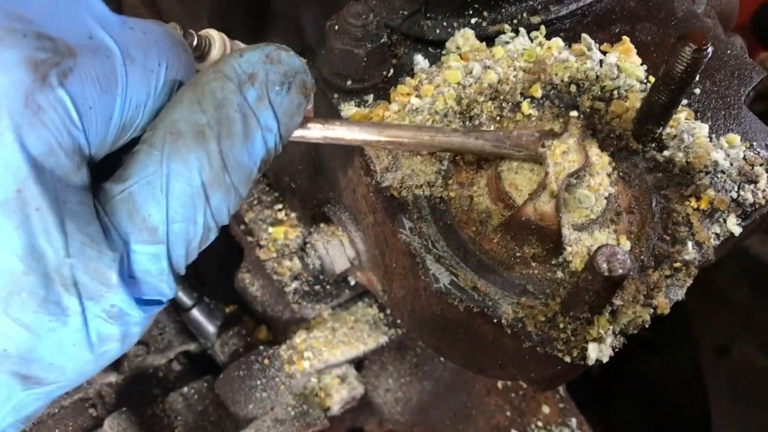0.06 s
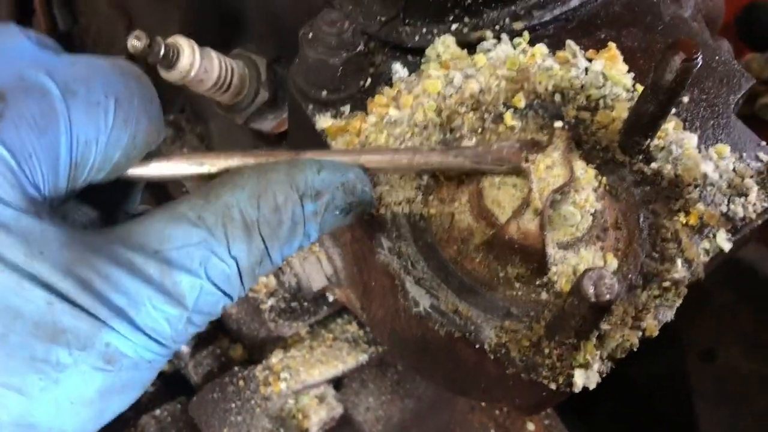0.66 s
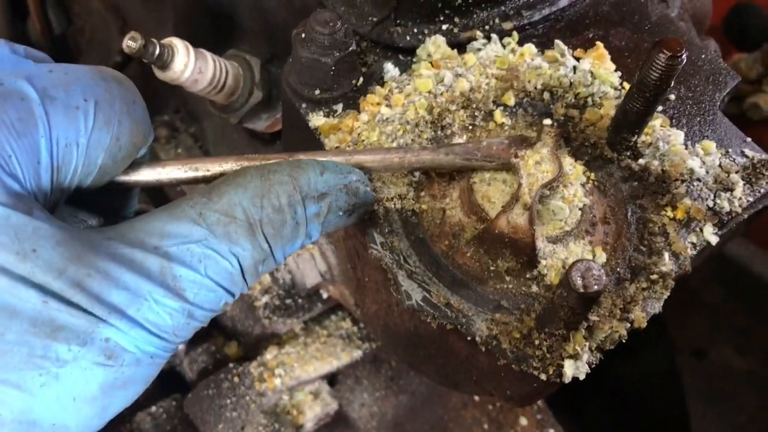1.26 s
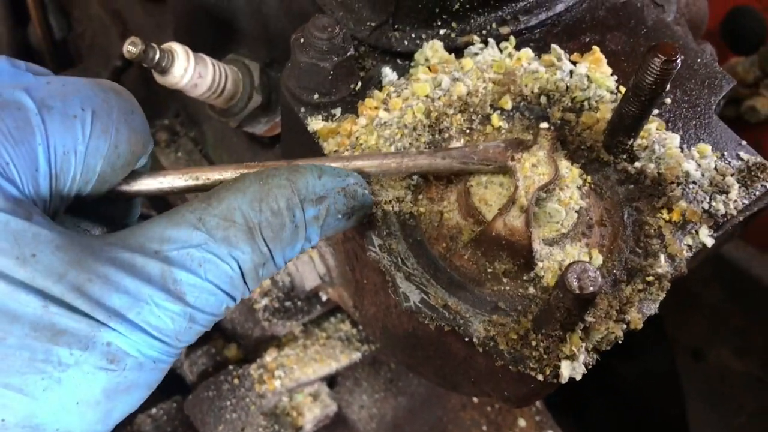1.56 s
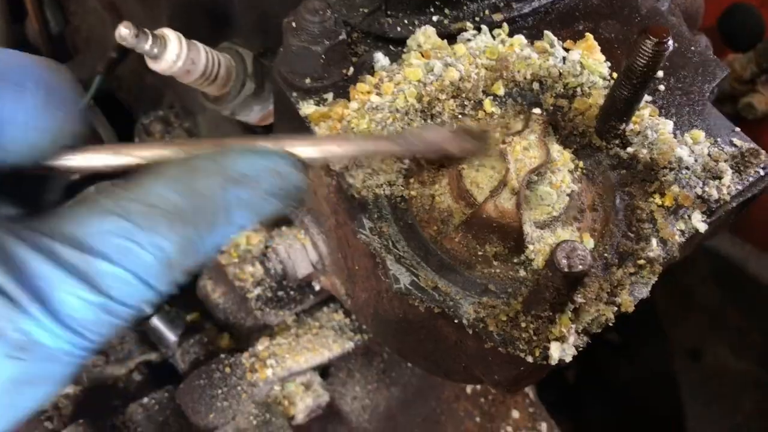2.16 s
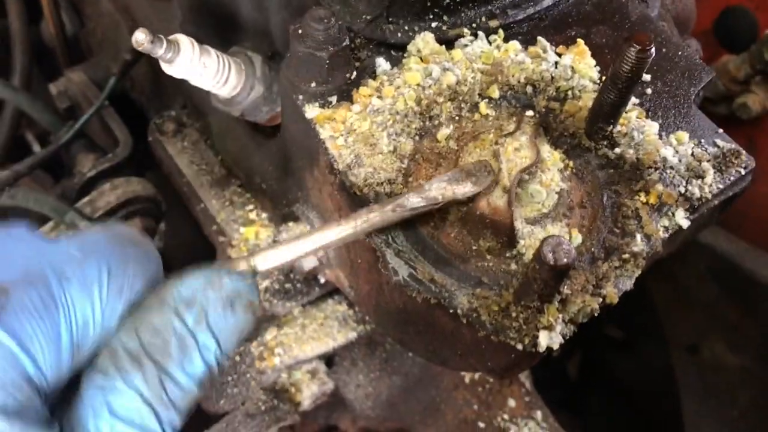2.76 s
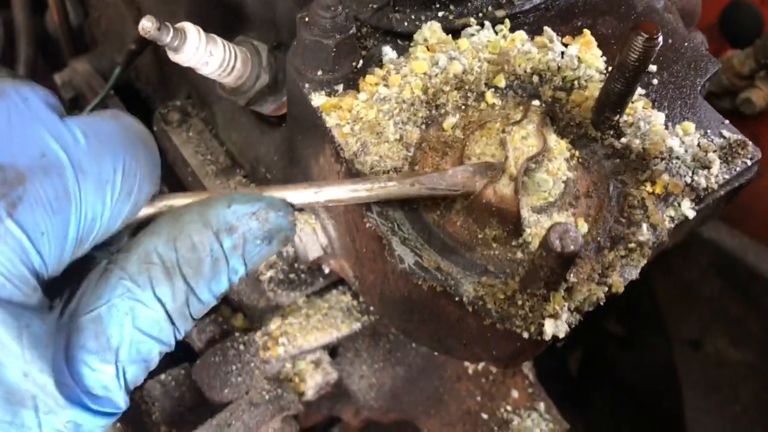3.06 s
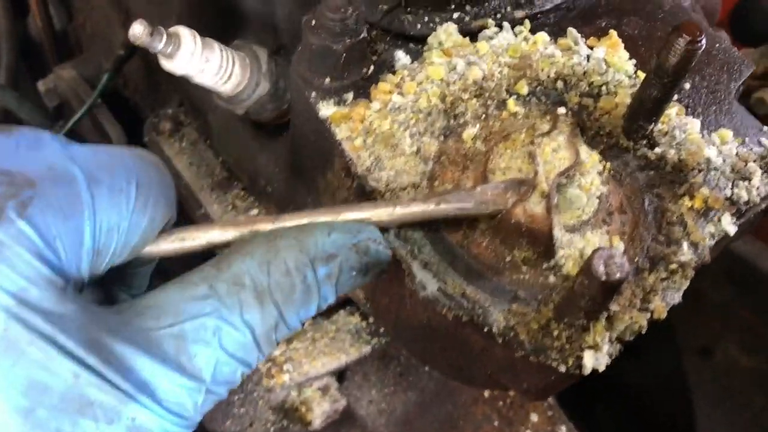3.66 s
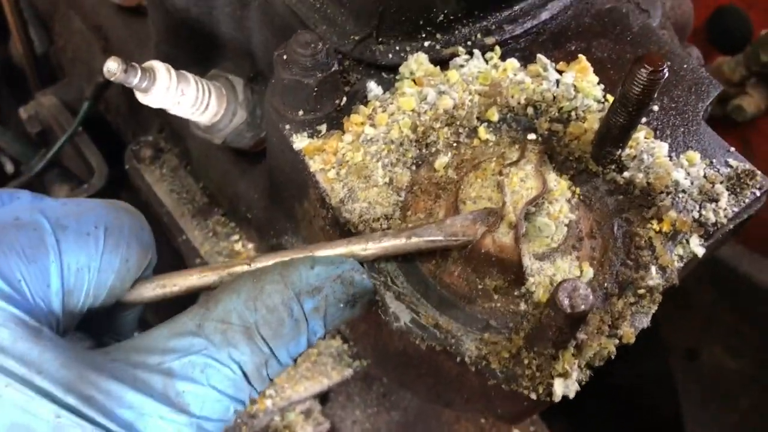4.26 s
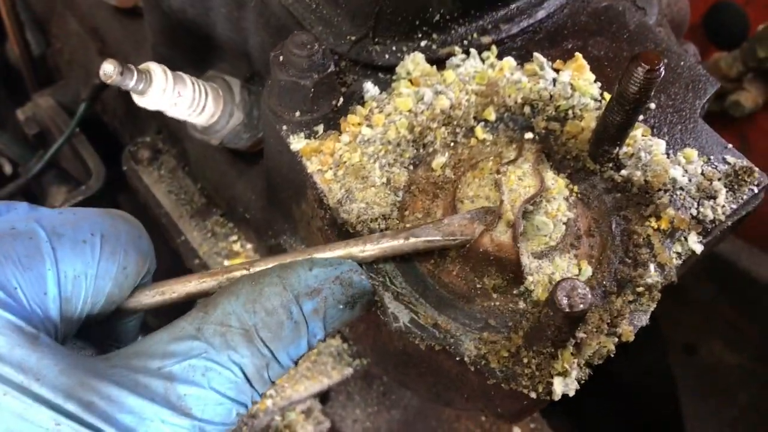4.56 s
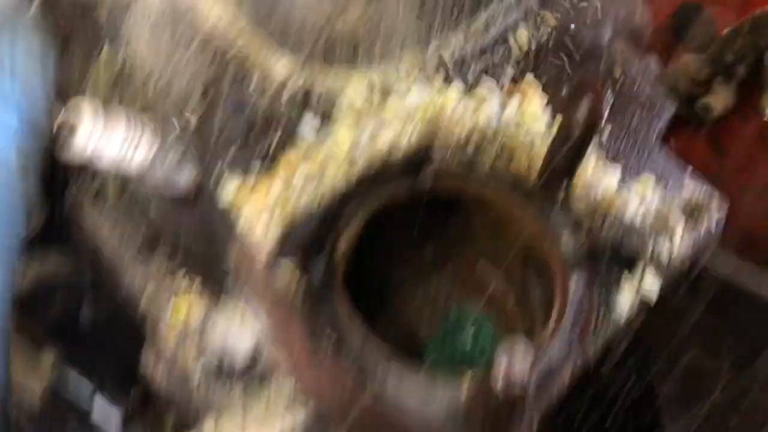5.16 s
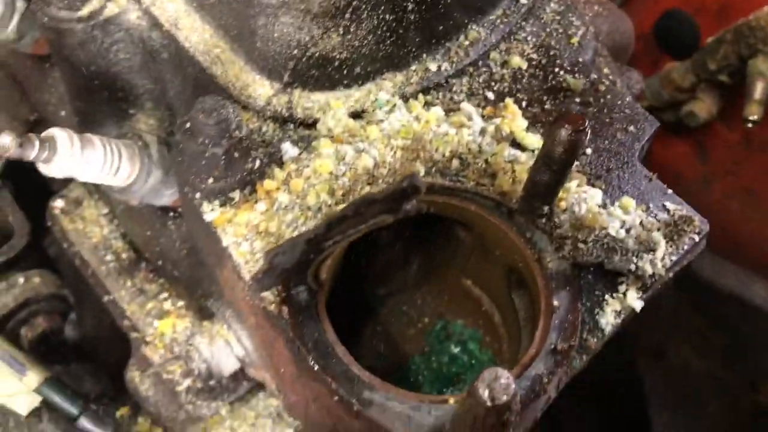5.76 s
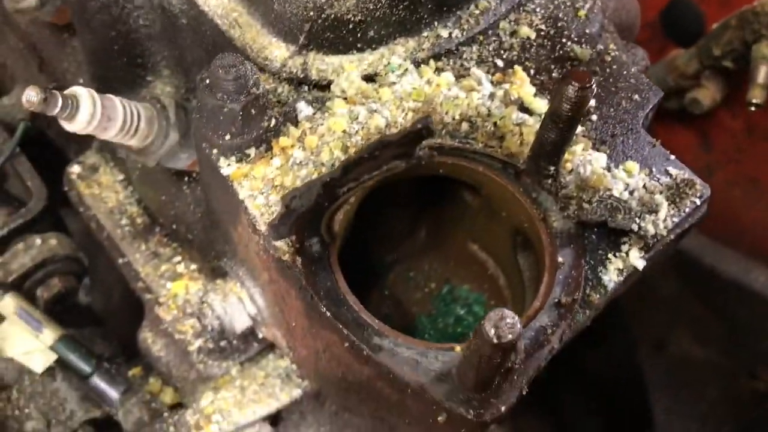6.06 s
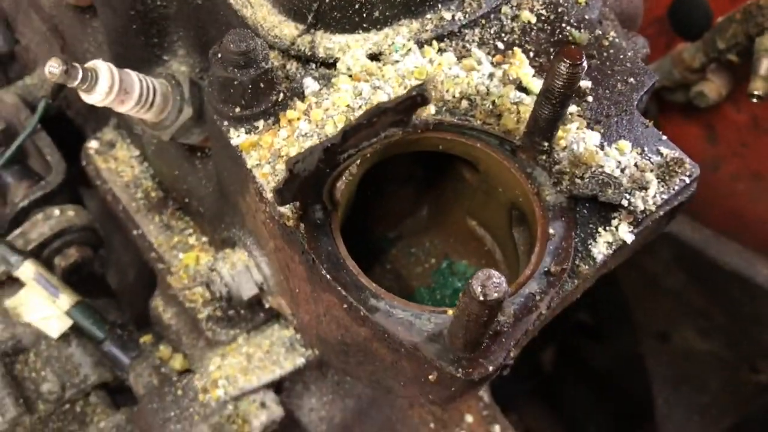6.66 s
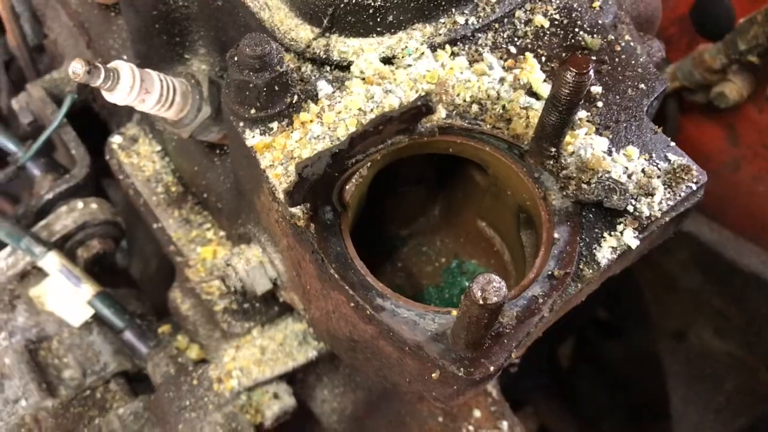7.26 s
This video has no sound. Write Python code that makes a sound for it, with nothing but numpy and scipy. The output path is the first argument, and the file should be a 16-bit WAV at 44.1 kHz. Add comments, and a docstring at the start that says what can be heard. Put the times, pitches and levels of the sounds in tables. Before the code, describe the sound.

Close gritty scraping and clicks on an engine, followed by a sharp crack, a splash and a part tumbling to the floor.

```python
"""A screwdriver scrapes and clicks under a crusted-in engine thermostat, close up, in a garage.
A rubber glove hisses along the shaft, crumbs snap off, and blade and crust ring at each slip.
The crust cracks, the uncorked housing booms and coolant sprays out. The freed thermostat knocks
its way down the engine bay, ringing each part it hits, and rattles to rest on the floor.
Under it all lies a room tone of air, hum and low drone."""
import sys
import numpy as np
from scipy import signal
from scipy.fft import rfft, irfft, next_fast_len
from scipy.io import wavfile

SR = 44100
rng = np.random.default_rng(int(sys.argv[2]) if len(sys.argv) > 2 else 0)


def store_wav(level_fs):
    """Save 16-bit WAV to argv[1]."""
    pcm = np.round(np.clip(np.atleast_2d(level_fs), -1, 1) * 32767)
    wavfile.write(sys.argv[1], SR, pcm.T.astype(np.int16))


N = 325899
TIME = np.arange(N) / SR
AFTER = TIME[:SR]  # the second that follows a hit
DETUNE = 0.014  # each contact shifts a loose part's modes by about this share


def amp(db):
    """Decibels to gain."""
    return 10 ** (np.asarray(db) / 20)


def unit(x):
    """Scales to rms 1."""
    return x / np.sqrt(np.mean(x ** 2) + 1e-20)


def curve_at(points, hz):
    """A curve's value on a log-frequency axis."""
    freqs, values = np.transpose(points)
    return np.interp(np.log(hz + 1), np.log(freqs + 1), values)


def colour(x, eq):
    """Shapes x with an EQ curve, at rms 1."""
    size = next_fast_len(len(x))
    hz = np.arange(size // 2 + 1) * SR / size
    return unit(irfft(rfft(x, size) * amp(curve_at(eq, hz)), size)[:len(x)])


def add(mix, start, sound):
    """Mixes a sound in at a start time in seconds."""
    part = mix[round(start * SR):][:len(sound)]
    part += sound[:len(part)]


def arch(start, length, db, skew=1, sharpness=1):
    """The envelope of one movement: it speeds up and slows down; a skew under 1 peaks early."""
    done = np.clip((TIME - start) / length, 0, 1)
    return amp(db) * abs(np.sin(np.pi * done ** skew)) ** sharpness


def flow(start, rise, db, t60, hold=0, sag_db_per_s=0):
    """The envelope of running liquid: attack, sagging hold, release."""
    since = TIME - start - rise
    fall_db = sag_db_per_s * np.clip(since, 0, hold) + 60 * np.maximum(since - hold, 0) / t60
    return np.clip(1 + since / rise, 0, 1) ** 2 * amp(db - fall_db)


def lumpy(db):
    """A gain that comes in uneven clumps, some tens a second."""
    return amp(db * colour(rng.standard_normal(N), [(8, 0), (45, 0), (120, -50), (400, -120)]))


def grains(per_s, spread_db, wash=0):
    """Tiny impacts of uneven size over a wash of still smaller ones."""
    sizes = amp(spread_db * np.minimum(rng.exponential(1, N), 5)) * rng.choice([-1, 1], N)
    hits = rng.random(N) < per_s / SR
    return unit(sizes * hits) + wash * rng.standard_normal(N)


def ring(modes, rise=0.00055, uneven_db=0, wander_hz=5):
    """Damped modes, uneven with the point of impact; loose contact widens them (wander_hz at 1 kHz)."""
    out = np.zeros(SR)
    for hz, db, t60 in modes:
        fade = amp(db + uneven_db * rng.standard_normal() - 60 * AFTER / t60)
        width_hz = wander_hz * hz / 1000
        drift = np.cumsum(rng.standard_normal(SR)) * np.sqrt(2 * np.pi * width_hz / SR)
        out += fade * np.sin(2 * np.pi * (hz * AFTER + rng.random()) + drift)
    return out * (1 - np.exp(-AFTER / rise))


def shifted(modes, tilt=0):
    """The modes as one contact sounds them: detuned a little, tilted about 3 kHz (dB/octave)."""
    return [(hz * (1 + DETUNE * rng.standard_normal()), db + tilt * np.log2(hz / 3000), t60)
            for hz, db, t60 in modes]


# edges of an impact's five bands (frequency [Hz]); a four-band hit omits the lowest band
BAND_EDGES = [120, 500, 1800, 4500, 8500, 16000]
def clatter(t60, bands_db, damping, rise, snap=0, bunched_db=0):
    """An optional snap, then countless close modes bunched into chance peaks; highs die sooner."""
    t, out = AFTER[:SR // 2], np.zeros(SR // 2)
    spike = snap * signal.unit_impulse(len(t), 10)
    peaks = [(hz, bunched_db * rng.standard_normal()) for hz in range(500, SR // 2, 70)]
    for hi, lo, db in zip(BAND_EDGES[::-1], BAND_EDGES[-2::-1], bands_db[::-1]):
        modes = spike + colour(rng.standard_normal(len(t)), peaks)
        band = signal.sosfilt(signal.butter(2, [lo, hi], "band", fs=SR, output="sos"), modes)
        fade = amp(-60 * t / t60 * (np.sqrt(lo * hi) / 3000) ** damping)
        out += amp(db) * band * fade * np.linalg.norm(fade) / np.linalg.norm(band * fade)
    return out * (1 - np.exp(-t / rise))


def tilted(bands_db, db, tilt):
    """Band levels of one hit, made brighter or duller by its tilt about 3 kHz (dB/octave)."""
    centres = np.sqrt(np.multiply(BAND_EDGES[1:], BAND_EDGES[:-1]))[-len(bands_db):]
    return np.add(bands_db, db) + tilt * np.log2(centres / 3000)


# EQ of the air and of the drone (frequency [Hz], level [dB])
AIR_EQ = [(20, -30.5), (45, -9), (70, -8), (130, -12.5), (260, -18), (480, -27.5), (950, -25),
          (2500, -36.5), (6500, -42), (16000, -44)]
DRONE_EQ = [(25, -24.5), (56, -12.5), (64, 6.5), (73, -19), (200, -17.5), (300, -20), (700, -53.5)]
# hum tones (frequency [Hz], level [dB])
HUM_TONES = [(102, -73), (149, -71.5), (199.2, -75.5)]
# drone swells (start [s], length [s], level [dB])
DRONE_SWELLS = [(2.552, 1.28, -65), (4.2, 1.95, -67), (5.499, 0.87, -58.5), (6.83, 0.61, -58)]
def room_tone(air_db=-62.5, drone_floor_db=-68.5):
    """The bed: still air, a wavering hum and a low drone that swells now and then."""
    out = amp(air_db) * colour(rng.standard_normal(N), AIR_EQ)
    for hz, db in HUM_TONES:
        drift = np.cumsum(rng.standard_normal(N)) * 0.53 / np.sqrt(SR)
        out += amp(db) * np.sqrt(2) * np.sin(2 * np.pi * (hz * TIME + drift))
    swells = np.max([arch(*swell) for swell in DRONE_SWELLS], axis=0) + amp(drone_floor_db)
    return out + swells * colour(rng.standard_normal(N), DRONE_EQ)


# glove slides (start [s], length [s], level [dB])
SLIDES = [(0, 0.056, -56), (0.136, 0.27, -64), (0.32, 0.14, -59.5), (0.414, 0.065, -63),
          (0.443, 0.032, -47.5), (0.478, 0.067, -59.5), (.53, 0.32, -71.5), (2.03, 0.26, -66),
          (3.26, 0.58, -67)]
# EQ of the rubber's hiss (frequency [Hz], level [dB])
GLOVE_EQ = [(200, -8), (700, -1), (1500, -7.5), (4000, 0), (9000, 0.5), (11000, 0), (15500, 3)]
# ring of the steel shaft (frequency [Hz], level [dB], t60 [s])
SHAFT_MODES = [(2520, 5, 0.053), (3190, 0.5, 0.061), (4620, -3.5, 0.069)]
def glove(release_db_per_s=213):
    """Rubber hisses over the shaft and catches as the grip shifts, ringing the steel faintly."""
    slides = sum(arch(*slide, skew=0.62, sharpness=0.92) for slide in SLIDES)
    release_db = release_db_per_s * TIME  # loosened dust crackles on as a slide ends
    slides_db = np.maximum.accumulate(20 * np.log10(slides + 1e-12) + release_db) - release_db
    catches = grains(per_s=75, spread_db=2)
    shaft = unit(signal.oaconvolve(catches, ring(SHAFT_MODES))[:N])
    hiss = colour(grains(per_s=2500, spread_db=2.1, wash=0.82), GLOVE_EQ) * lumpy(db=2)
    grip = arch(start=0, length=0.97, db=-75.5, skew=0.34, sharpness=0.4)
    return amp(slides_db) * hiss + grip * shaft


# crumb snaps (time [s], level [dB])
CRUMBS = [(0.514, -34), (0.9347, -42.5), (1.112, -30), (1.841, -43), (4.9084, -31), (4.9364, -38),
          (5.129, -31), (5.296, -33), (6.8094, -49), (7.0588, -41), (7.317, -43)]
# EQ of a bright tick, crumb or drip (frequency [Hz], level [dB])
TICK_EQ = [(200, -41.5), (1500, -24), (3300, -5.5), (7000, 3.5), (11000, -2.5), (16000, 4.5)]
def crumbs(trim_db=-2, t60=0.007):
    """Single grains of crust snap off with a dry tick."""
    out, t = np.zeros(N), AFTER[:SR // 20]
    for start, db in CRUMBS:
        tick = colour(rng.standard_normal(len(t)), TICK_EQ) * amp(-60 * t / t60)
        add(out, start, amp(db + trim_db) * tick / abs(tick).max())
    return out


# blade strokes, and its light contact between them (start [s], length [s], level [dB], rumble send [dB])
STROKES = [(2.134, 0.059, -43, -15.5), (2.194, 0.26, -44, -17), (2.34, 0.35, -58, -7.5),
           (2.49, 0.021, -38.5, -32), (2.638, 0.21, -59.5, -11.5), (2.803, 0.34, -50, -5.5),
           (3.087, 0.24, -58.5, 1.5), (3.254, 0.25, -71, 3.5), (3.621, 0.1, -55.5, -1.5),
           (3.79, 0.15, -59, -0.5)]
RESTING_CONTACT = (1, 5, -82.5, -5.5)
# EQ of the grit and of the housing's rumble (frequency [Hz], level [dB])
GRIT_EQ = [(500, -15.5), (950, -7.5), (1120, -9), (1300, -2.5), (3000, -7), (3800, 0.5), (5000, -4.5),
           (6500, -7.5), (8500, -8), (16000, -12.5)]
RUMBLE_EQ = [(120, -44), (200, 4), (280, -2.5), (350, 6), (560, -6.5), (660, 7.5), (760, -9.5), (1400, -10),
             (2500, -43.5)]
# ring of shaft and housing under the grinding (frequency [Hz], level [dB], t60 [s])
GRIND_MODES = [(1107, -6.5, 0.12), (1497, -3.5, 0.077), (2266, -2.5, 0.0665), (3395, 6, 0.01605),
               (4140, 2.5, 0.023), (5470, 1.5, 0.027), (6310, 6, 0.017)]
def blade_scrape():
    """The blade grinds grains off the crust and shakes the housing; strokes bite fast, then ease."""
    grit = colour(grains(per_s=4500, spread_db=1.5, wash=0.27), GRIT_EQ)
    catches = grains(per_s=3000, spread_db=4.5, wash=0.77)
    metal = unit(signal.oaconvolve(catches, ring(GRIND_MODES, wander_hz=5.8))[:N])
    grind = amp(-1.5) * (grit + amp(-4.5) * metal) * lumpy(db=1)
    rumble = colour(grains(per_s=900, spread_db=5.3, wash=1), RUMBLE_EQ)
    out = np.zeros(N)
    for start, length, db, rumble_db in STROKES + [RESTING_CONTACT]:
        out += arch(start, length, db, skew=0.64, sharpness=1.88) * (grind + amp(rumble_db) * rumble)
    return out


# blade slips (time [s], t60 [s], level [dB], tilt [dB/octave], blade ring [dB], crust ring [dB])
SLIPS = [(2.1485, 0.015, -27, -1.5, -44, -26.5), (2.17, .03, -58, -9, -53, -64),
         (2.193, 0.022, -64, 6, -63, -70), (2.3803, 0.0092, -36, 4, -29.5, -56),
         (2.4813, 0.004, -23, 1.5, -24.5, -32), (2.5056, 0.027, -29, -3.5, -34, -30),
         (2.589, 0.018, -61, 8.5, -49, -69), (2.723, 0.022, -68, 11, -65, -73),
         (3.84, 0.063, -47.5, 3, -77, -66)]
# a click's four bands, low to high (level [dB])
CLICK_BANDS = [-31.5, 0.5, -1, -5]
# ring of the pressed blade and of the crusted rim (frequency [Hz], level [dB], t60 [s])
BLADE_MODES = [(1219, 2, 0.036), (1143, -13.5, 0.019), (3706, 2.5, 0.015), (3920, 5.5, 0.015)]
CRUST_MODES = [(2424, -6, 0.064), (2917, -2.5, 0.036), (3240, -4, 0.038), (3500, 4, 0.022),
               (5900, -6, 0.019)]
def blade_slips(full_slip_db=-28, tilt_per_db=0.38):
    """Each slip clicks and rings blade and crust; softer slips ring the blade duller."""
    out = np.zeros(N)
    for start, t60, db, tilt, blade_db, crust_db in SLIPS:
        blade = shifted(BLADE_MODES, tilt_per_db * (blade_db - full_slip_db))
        add(out, start, clatter(t60, tilted(CLICK_BANDS, db, tilt), damping=0.11, rise=1e-4, snap=0.72))
        add(out, start, amp(blade_db) * ring(blade, wander_hz=22))
        add(out, start, amp(crust_db) * ring(CRUST_MODES, wander_hz=30.2))
    return out


# cracks in the crust (time [s], t60 [s], level [dB], tilt [dB/octave], rim ring [dB])
CRACKS = [(4.9993, 0.0043, -7, -1, -28.5), (5.0175, 0.011, -7.5, -3, -30.5), (5.0238, 0.032, -14, 1.5, -31),
          (5.027, 0.032, -14, 3.5, -28.5), (5.0352, 0.017, -12.5, -1.5, -19.5),
          (5.043, 0.015, -10, -3.5, -6.5), (5.055, 0.038, -14.5, 1.5, -27.5),
          (5.0722, 0.019, -7, 0.2, -19.5), (5.078, 0.0028, -13.5, 1.5, -18.5)]
# a crack's four bands, low to high (level [dB])
CRACK_BANDS = [-8, -1, -2, -6.5]
# ring of the housing's rim (frequency [Hz], level [dB], t60 [s])
RIM_MODES = [(1038, -10.5, 0.06), (2155, -4.5, 0.036), (2440, 1, 0.028), (2780, -3, .03), (3360, 2, .026),
             (4120, -1.5, 0.024)]
def crust_break():
    """The crust gives way in a run of sharp cracks, ringing the rim as it tears free."""
    out = np.zeros(N)
    for start, t60, db, tilt, rim_db in CRACKS:
        add(out, start, clatter(t60, tilted(CRACK_BANDS, db, tilt), damping=0.14, rise=8e-5, snap=1.7))
        add(out, start, amp(rim_db) * ring(shifted(RIM_MODES), wander_hz=30.06))
    return out


# coolant gushing out, then landing on the floor (start [s], attack [s], level [dB], t60 [s])
GUSHES = [(4.995, .04, -22.5, 0.23), (6.146, 0.052, -32.5, 0.088)]
# EQ of the spray (frequency [Hz], level [dB])
SPRAY_EQ = [(150, -6.5), (400, -8), (900, -9), (2000, -4), (4000, -7.5), (7000, -9), (16000, -14)]
# wet slaps on metal and floor (time [s], t60 [s], level [dB], tilt [dB/octave])
SPLASHES = [(5.116, 0.035, -41.5, 9), (5.17, 0.077, -43, 4.5), (5.426, 0.062, -45.5, 3.5),
            (5.696, 0.14, -33, 0.5), (6.29, 0.068, -54.5, -5.5), (6.319, 0.071, -44, -2.5)]
# a splash's five bands, low to high (level [dB])
SPLASH_BANDS = [-9.5, -6, -0.5, 0, -3.5]
def coolant():
    """Droplets fizz in uneven clumps and thin to a patter, then drips; larger gouts slap down."""
    spray = colour(grains(per_s=750, spread_db=3.8, wash=1), SPRAY_EQ) * lumpy(db=2)
    patter = flow(start=5.18, rise=0.031, db=-48, t60=0.97, hold=1.235, sag_db_per_s=6.5)
    out = (patter + sum(flow(*gush) for gush in GUSHES)) * spray
    drips = colour(grains(per_s=22, spread_db=2.4), TICK_EQ)
    out += flow(start=6.08, rise=0.82, db=-76, t60=3.1) * drips
    for start, t60, db, tilt in SPLASHES:
        add(out, start, clatter(t60, tilted(SPLASH_BANDS, db, tilt), damping=0.45, rise=0.0028))
    return out


# pressure pops (time [s], level [dB])
POPS = [(5.004, -34), (5.026, -18.5), (5.077, -31)]
# boom of the housing (frequency [Hz], level [dB], t60 [s])
HOUSING_MODES = [(172.2, 0.5, 0.21), (137, -3.5, 0.07), (519, -22.5, 0.7)]
def housing_pop():
    """The pressure uncorks the housing, which booms in its low modes."""
    out = np.zeros(N)
    for start, db in POPS:
        add(out, start, amp(db) * ring(HOUSING_MODES, rise=0.0016, wander_hz=0.96))
    return out


# knocks on engine parts, then the landing on the floor (time [s], t60 [s], level [dB], tilt [dB/octave])
KNOCKS = [(5.221, 0.31, -40, 1), (5.5514, 0.057, -10.5, 1.6), (5.601, 0.062, -12, 1),
          (5.642, 0.066, -10, -2), (5.774, 0.1, -28, 0), (5.8421, 0.13, -29.5, 0), (6, 0.072, -36.5, -2),
          (6.183, 0.12, -32, 0.5)]
# a knock's five bands, low to high (level [dB])
KNOCK_BANDS = [-19, -7, 0, 1, 1]
# ring of each knock in turn, and of a sheet-metal panel (frequency [Hz], level [dB], t60 [s])
KNOCK_MODES = [
    [(3290, -41, 0.24), (3820, -37.5, 0.13), (4000, -37, 0.19)],
    [(143, -33, .25), (1362, -18.5, 0.1), (1865, -16, 0.063), (4700, -23, 0.08), (7050, -17.5, 0.048)],
    [(1286, -15.5, 0.22), (1770, -18.5, 0.061), (2090, -11, 0.055), (5400, -12, 0.065),
     (6460, -17.5, 0.065)],
    [(313, -26, 0.13), (370, -32.5, .3), (585, -24, 0.15), (706, -16, 0.073), (873, -13, 0.13),
     (965, -13.5, 0.13), (1104, -6, 0.068), (1498, -13, 0.1), (2334, -21, 0.19), (6200, -9, 0.05)],
    [(206, -27.5, 0.14), (364, -27.5, 0.13), (2740, -34.5, 0.16), (5410, -23.5, 0.063)],
    [(205, -28, 0.069), (2365, -27, 0.067), (2900, -26.5, 0.066), (3570, -13, 0.03), (5150, -20, 0.057),
     (6220, -18.5, 0.079)],
    [(2314, -33.5, 0.066), (2990, -34.5, 0.055), (5620, -28.5, 0.081)],
    [(609, -43, 0.21), (1040, -38.5, 0.15), (1385, -31, .07), (2417, -29, 0.23)],
]
PANEL_MODES = [(71, -44, 0.75), (924, -32.5, 1), (1060, -39.5, 0.2)]
def falling_knocks(panel_start=5.645):
    """Each knock of the falling thermostat clatters and rings; a panel hums on after the heaviest."""
    out = np.zeros(N)
    for (start, t60, db, tilt), modes in zip(KNOCKS, KNOCK_MODES):
        bands_db = tilted(KNOCK_BANDS, db, tilt)
        add(out, start, clatter(t60, bands_db, damping=0.36, rise=0.00078, bunched_db=1))
        add(out, start, ring(modes, rise=0.0006, wander_hz=7))
    low_cut = signal.butter(2, BAND_EDGES[0], "high", fs=SR, output="sos")
    out = signal.sosfilt(low_cut, out)  # the knocks keep clear of the deep bass
    add(out, panel_start, ring(PANEL_MODES, rise=0.004, wander_hz=0.98))
    return out


# spells of rim chatter (start [s], length [s], level [dB])
CHATTER = [(6.025, 0.44, -47), (6.61, 0.41, -66.5)]
# bounces (time [s], level [dB], brightness [dB/octave on the ring, dB on the clatter's treble])
BOUNCES = [(6.038, -39, -6), (6.1684, -39.5, 4), (6.2243, -39, 4.5), (6.276, -51, 10), (6.317, -48, -2),
           (6.348, -44, -3), (6.398, -47, -16), (6.422, -49, -5), (6.4525, -45.5, 5), (6.478, -43.5, 5),
           (6.6284, -47.5, 2), (6.646, -49.5, 7), (6.7139, -55, -8), (6.7443, -52.5, 3), (6.845, -55, -17)]
# ring of the loose thermostat (frequency [Hz], level [dB], t60 [s])
THERMOSTAT_MODES = [(2410, -1, 0.13), (3070, -4, 0.097), (3960, -4, 0.11), (4400, -9.5, 0.11),
                    (5710, -1, 0.1), (6450, -3.5, 0.085)]
def floor_rattle(ring_db=-2.5, wander_hz=26):
    """The thermostat bounces and rocks on its rim, jingling; each bounce has its own brightness."""
    rocking = sum(arch(*spell) for spell in CHATTER) * grains(per_s=280, spread_db=6.2)
    jingle = ring(THERMOSTAT_MODES, wander_hz=wander_hz)
    add(jingle, 0, clatter(t60=0.028, bands_db=[-2, -16, 2, 0], damping=0.22, rise=0.0002))
    out = signal.oaconvolve(rocking, jingle / np.linalg.norm(jingle))[:N]
    for start, db, brightness in BOUNCES:
        modes = shifted(THERMOSTAT_MODES, brightness)
        add(out, start, amp(db + ring_db) * ring(modes, rise=0.0005, uneven_db=3.5, wander_hz=wander_hz))
        bands_db = [-14, -6, brightness - 16, brightness - 11.5]
        add(out, start, amp(db) * clatter(0.093, bands_db, damping=0.33, rise=0.00044, bunched_db=1))
    return out


# the garage's decay (frequency [Hz], t60 [s])
GARAGE_DECAY = [(150, 0.55), (1000, 0.28), (4000, 0.19), (9000, 0.13), (16000, 0.098)]
def garage_reverb(send, predelay=0.004):
    """A diffuse tail whose treble dies first."""
    noise = rng.standard_normal(SR) * (AFTER > predelay)
    hz, t, spectrum = signal.stft(noise, SR, nperseg=256)
    fade = amp(-60 * t / curve_at(GARAGE_DECAY, hz)[:, None])
    tail = signal.istft(spectrum * fade, SR, nperseg=256)[1]
    return signal.oaconvolve(send, tail / np.linalg.norm(tail))[:N]


def scene():
    """The mono mix: near sounds are almost dry; those down in the engine bay carry more room."""
    near = blade_scrape() + blade_slips() + glove() + crumbs()
    burst = crust_break() + housing_pop()
    below = falling_knocks() + coolant() + floor_rattle()
    reverb = garage_reverb(amp(-16) * near + amp(-19) * burst + amp(-13.5) * below)
    return (near + burst + below + reverb + room_tone())[None]


def record(dry, ceiling=0.94, cutoff_hz=16050):
    """A soft clip rounds the loudest peaks, then a steep low-pass trims the top."""
    rounded = ceiling * np.tanh(dry / ceiling)
    low_pass = signal.firwin(401, cutoff_hz, window=("kaiser", 8), fs=SR)
    return signal.oaconvolve(rounded, low_pass[None], "same")


dry = scene()
out = record(dry)
store_wav(out)
```